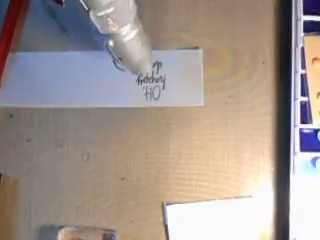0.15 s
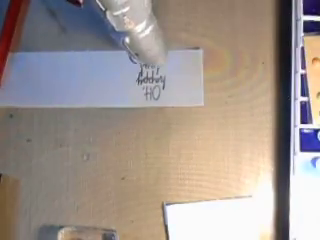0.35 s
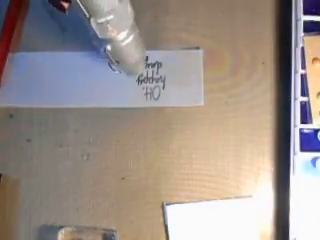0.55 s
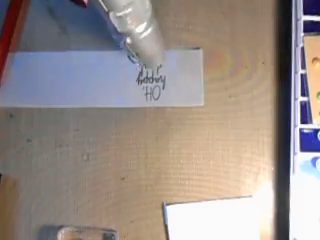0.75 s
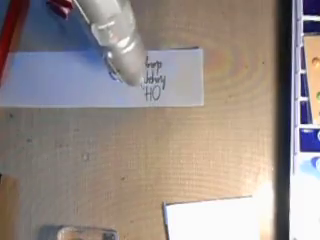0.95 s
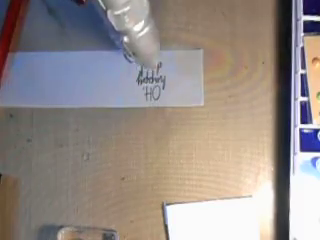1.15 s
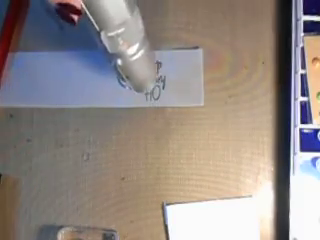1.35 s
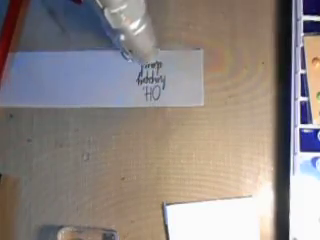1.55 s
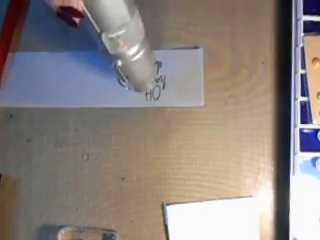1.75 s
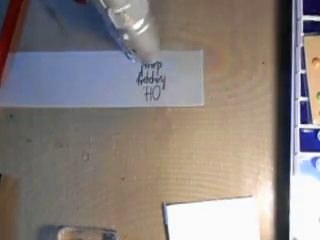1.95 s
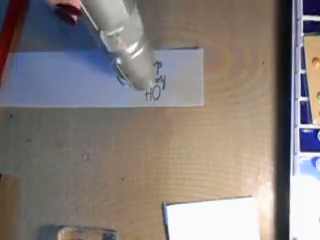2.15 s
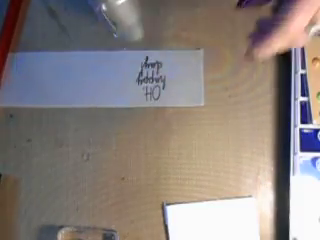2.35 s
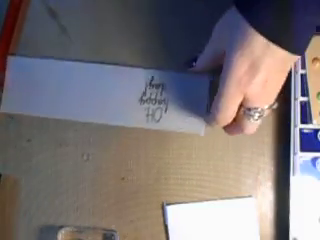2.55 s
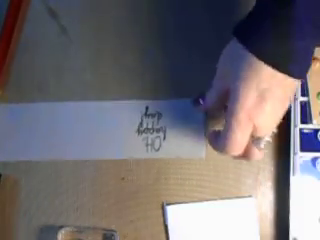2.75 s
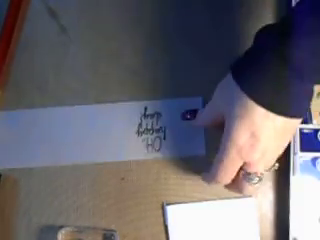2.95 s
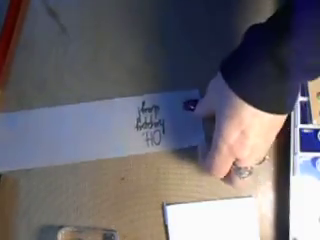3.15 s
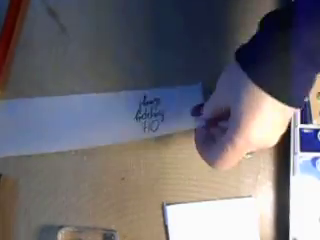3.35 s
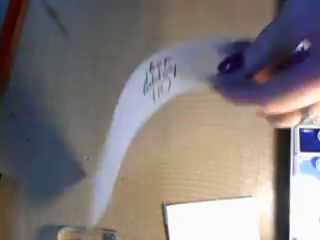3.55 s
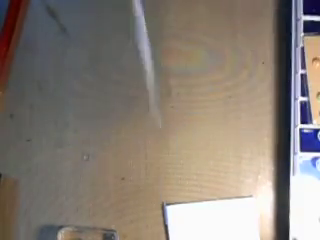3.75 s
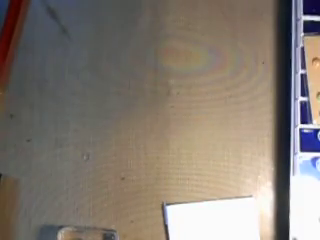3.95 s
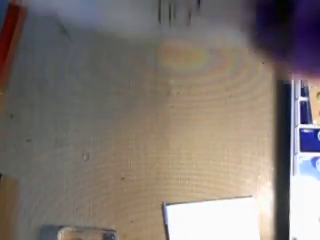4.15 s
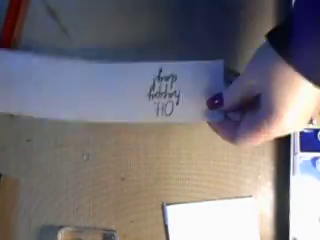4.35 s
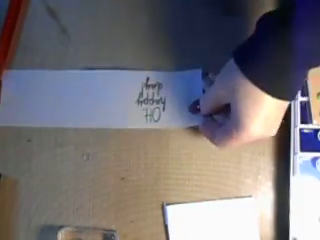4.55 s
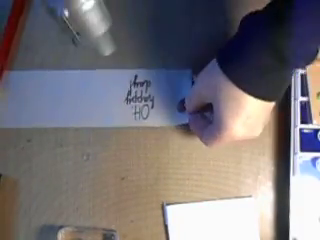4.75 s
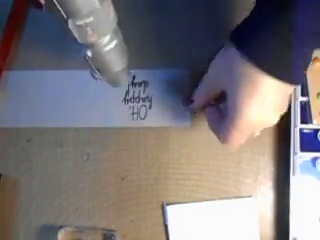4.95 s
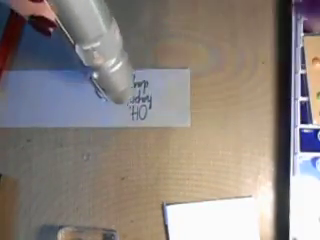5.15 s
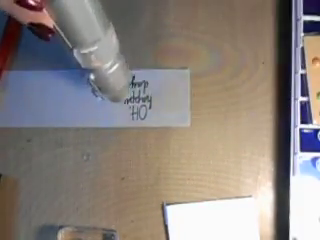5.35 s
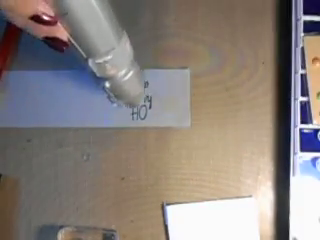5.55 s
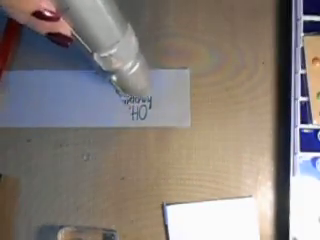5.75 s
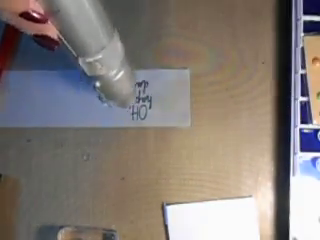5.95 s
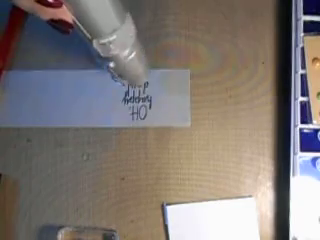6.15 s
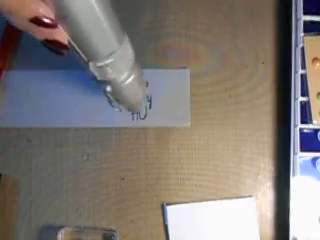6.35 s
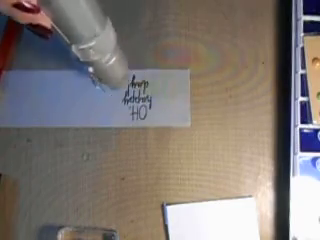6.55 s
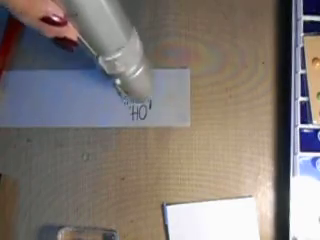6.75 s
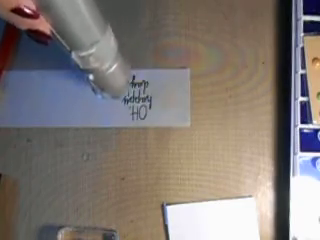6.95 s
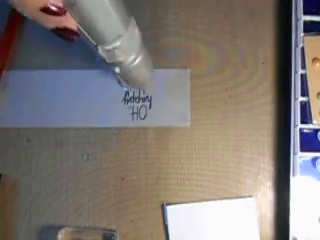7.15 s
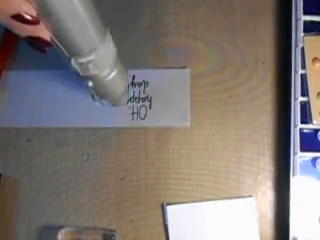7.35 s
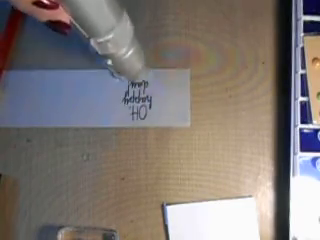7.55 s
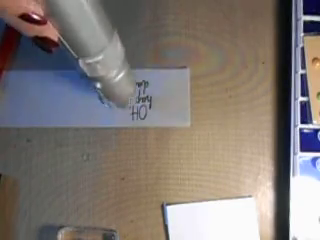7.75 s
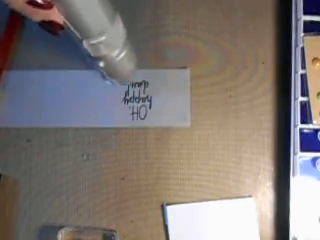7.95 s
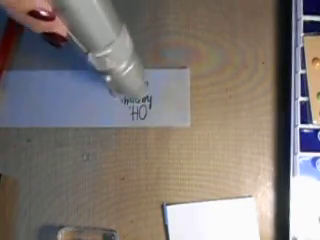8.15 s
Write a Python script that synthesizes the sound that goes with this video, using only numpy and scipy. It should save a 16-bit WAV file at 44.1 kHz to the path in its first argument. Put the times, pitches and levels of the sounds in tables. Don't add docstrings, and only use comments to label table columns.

```python
import sys
import numpy as np
from scipy import signal
from scipy.fft import rfft, irfft, next_fast_len
from scipy.io import wavfile
from scipy.ndimage import uniform_filter1d, map_coordinates

SR = 44100
rng = np.random.default_rng(int(sys.argv[2]) if len(sys.argv) > 2 else 0)


def transcribe(signal):
    frames = np.atleast_2d(signal).T
    limited = np.clip(frames, -1, 1)
    pcm = np.round(limited * 32767).astype(np.int16)
    wavfile.write(sys.argv[1], SR, pcm)


def magnitude_from_level(level_db):
    exponent = np.asarray(level_db, float) / 20
    return 10 ** exponent


N = 362061
RIPPLE_HZ, FIRST_RIPPLED = 120, 9
USUAL_HZ, STEP = 229, 128


def unit(x):
    return x / np.sqrt(np.mean(x ** 2) + 1e-20)


def along(points, hz):
    f, v = np.transpose(points)
    return np.interp(np.log(hz + 1), np.log(f + 1), v)


def curves(rows):
    s, *cols = np.transpose(rows)
    t = np.arange(N) / SR
    return [np.interp(t, s, c, left=c[0], right=c[-1]) for c in cols]


def wobble(rate, size=1):
    knots = rng.standard_normal(int(N * rate / SR) + 4)
    return map_coordinates(knots, [np.arange(0, N, size) * rate / SR], order=1)


def filtered(x, gain_db):
    m = next_fast_len(len(x) + 8192)
    gain = magnitude_from_level(gain_db(np.fft.rfftfreq(m, 1 / SR)))
    return irfft(rfft(x, m) * gain, m)[:len(x)]


def noise(gain_db):
    return unit(filtered(rng.standard_normal(N), gain_db))


ORDER_LEVELS = [-43.5, -54.5, -43.5, -44.5, -33.5, -29, -25.5, -33, -26.5, -30.5, -37.3, -41, -37.0, -35.8,
                -44, -40, -39, -33, -39, -34, -33.5, -38, -43, -41.5, -33, -33, -36.5, -48, -43.5, -41, -37,
                -43.5, -38.5, -42, -45, -45, -44.5, -45, -45.5, -41, -62, -50.5, -40, -49.3, -56]
# frequency_hz, level_db
SIDE_LINES = [(2000, -42.5), (3000, -47.5), (3600, -48.5), (4600, -42), (5500, -45), (6500, -47.5),
              (8500, -51), (10300, -57)]


def whine(flutter_db, side_flutter_db, trim_db, spread):
    turn = np.exp(1j * shaft_angle()).astype(np.complex64)
    mains = np.exp(2j * np.pi * RIPPLE_HZ * np.arange(N) / SR).astype(np.complex64)
    orders = np.arange(len(ORDER_LEVELS)) + 1
    out, spin = np.zeros(N), 1

    def smooth(slow):
        return np.interp(np.arange(N), np.arange(0, N, STEP), slow)

    for k, db, gain in zip(orders, ORDER_LEVELS, arrival(orders)):
        spin = spin * turn
        start = np.exp(1j * (np.pi * k * k / spread + .5 * wobble(2, size=STEP)))
        line_db = db + trim_db * k / FIRST_RIPPLED + flutter_db * wobble(7, size=STEP)
        line = smooth(magnitude_from_level(line_db) * gain * start)
        side_db = along(SIDE_LINES, k * USUAL_HZ) + 2 * rng.standard_normal()
        side_db = side_db + side_flutter_db * wobble(5, size=STEP)
        side = smooth(magnitude_from_level(side_db) * np.sqrt(gain) * start)
        ripple = (mains * np.exp(1j * rng.uniform(0, 2 * np.pi))).real * (k >= FIRST_RIPPLED)
        out += (spin * (line + 2j * ripple * side)).imag
    return np.sqrt(2) * out


# time_s, shaft_hz
SHAFT_SPEED = [(0.0, 228.2), (0.73, 229.4), (0.8, 228.2), (1.39, 228.6), (1.55, 227.6), (1.76, 228.7),
               (2.19, 228.5), (2.38, 227.7), (2.79, 229.0), (3.41, 229.0), (4.0, 229.9), (4.39, 229.9),
               (4.64, 228.0), (4.92, 229.5), (6.54, 229.1), (6.61, 229.5), (8.14, 228.9), (8.21, 228.4)]


def shaft_angle():
    return 2 * np.pi * np.cumsum(curves(SHAFT_SPEED)[0]) / SR


# time_s, pose (numbered as the rows of POSE_SOUND)
HOLDING = [(0, 0), (2.2, 0), (2.36, 1), (2.6, 1), (2.68, 2), (3.3, 2), (3.45, 3), (4.4, 3), (4.5, 4),
           (4.76, 4), (4.84, 5), (5.12, 5), (5.2, 6), (8.21, 6)]
# direct_db, swell_share as the nozzle nears, aside_share of the aside colour in the rush
POSE_SOUND = [
    (-3, 0.25, 0),
    (-3.5, 0.067, 0.19),
    (-2.5, 0, 0.87),
    (-4.3, 0, 1),
    (-2, 0, 1),
    (-2, 0, 0),
    (-3.5, 0.29, 0),
]
# pose, share, delay_ms, added_ms at full reach, added_ms at full sweep
MOVING_PATHS = [(0, 0.43, 0.265, -0.001, 0.002), (0, 0.28, 2.031, -0.03, -0.023),
                (0, 0.2, 2.779, 0.022, 0.016), (0, 0.23, 2.559, 0.03, -0.007),
                (0, 0.3, 0.611, 0.007, 0.008), (0, 0.17, 4.199, -0.041, -0.007),
                (0, 0.12, 2.812, 0.064, 0.007), (0, 0.12, 2.342, -0.043, 0.02),
                (0, 0.16, 2.392, 0.002, 0.006), (6, 0.32, 3.005, -0.006, -0.001),
                (6, 0.26, 0.944, 0.012, 0.014), (6, 0.19, 0.662, -0.07, -0.024),
                (6, 0.14, 1.899, 0.088, 0.028), (6, 0.34, 3.646, 0.003, -0.005),
                (6, 0.16, 2.036, -0.047, 0.006), (6, 0.21, 0.148, 0.024, -0.004),
                (6, 0.27, 3.96, 0.001, 0.003), (6, 0.08, 3.286, -0.015, 0.087)]
# pose, share, delay_ms
STILL_ECHOES = [(1, 0.34, 0.254), (1, 0.22, 1.785), (1, 0.17, 3.751), (1, 0.21, 3.488), (1, 0.13, 2.9),
                (2, 0.51, 0.232), (2, 0.31, 3.455), (2, 0.34, 2.323), (2, 0.26, 1.907), (2, 0.24, 1.48),
                (3, 0.71, 0.242), (3, 0.62, 3.482), (3, 0.5, 1.938), (3, 0.38, 2.017), (3, 0.2, 1.605),
                (4, 0.31, 0.769), (4, 0.09, 3.052), (4, 0.27, 1.777), (4, 0.37, 2.049), (4, 0.22, 2.134),
                (5, 0.32, 0.736), (5, 0.37, 2.921), (5, 0.24, 1.793), (5, 0.27, 1.369), (5, 0.21, 0.248)]


def arrival(orders):
    pose, reach, sweep = (v[::STEP] for v in (*curves(HOLDING), *hand()))
    paths = np.ones((len(POSE_SOUND), len(orders), len(pose)), complex)
    still = [(*row, 0, 0) for row in STILL_ECHOES]
    for held, share, ms, per_reach, per_sweep in list(MOVING_PATHS) + still:
        delay = (ms + per_reach * reach + per_sweep * sweep) / 1000
        paths[int(held)] += share * np.exp(-2j * np.pi * USUAL_HZ * orders[:, None] * delay)
    total = 0
    for held, (db, swell, _) in enumerate(POSE_SOUND):
        presence = np.clip(1 - abs(pose - held), 0, 1)
        total = total + presence * magnitude_from_level(db) * np.exp(swell * reach) * abs(paths[held]) ** 1.235
    return total


# time_s, lap_size
HAND_LAPS = [(0, 0), (.37, 0.57), (.72, 0.66), (1.1, 0.83), (1.46, 0.62), (1.86, 1.6), (2.28, 0.86),
             (2.6, 0), (4.92, 0), (5.27, 0.77), (5.55, 0.69), (5.78, .65), (6.12, 0.62), (6.46, 0.85),
             (6.82, 0.88), (7.16, 0.86), (7.54, 1), (7.9, 0.67), (8.27, 1)]


def hand():
    s, size = np.transpose(HAND_LAPS)
    t = np.arange(N) / SR
    laps_done = np.interp(t, s, range(len(s)))
    place = np.interp(t, s, size) * np.exp(2j * np.pi * laps_done)
    return place.real, place.imag


# time_s, level_db
AIR_LEVEL = [(0, -20.5), (1, -21), (2, -21.5), (2.4, -21.5), (2.7, -24.5), (3.3, -21.5), (3.6, -21),
             (3.85, -21.5), (4.1, -20.5), (4.3, -20.5), (4.5, -23), (4.75, -22.5), (4.9, -21.5),
             (5.3, -21.5), (5.7, -21.5), (6.5, -21.5), (7.5, -21.5), (8.21, -21.5)]
# frequency_hz, density_db per Hz
RUSH_COLOUR = [(20, -22), (70, -28), (150, -12), (300, -10.5), (620, -1), (1000, -6.5), (1450, 1),
               (2000, -2), (3200, -8.5), (4200, -6), (5000, -9), (6200, -13), (8000, -13), (9800, -17.5)]
# centre_hz, width_hz, depth_db
ECHO_HOLLOWS = [(386.5, 39, -10), (514, 44.6, -7.5), (762.5, 30.6, -9), (1198, 92, -10.5), (1763, 103, -3),
                (2199, 77, -11.5), (2444, 29, -7), (2916, 100, -7.5), (3610, 300, -7), (4490, 130, -6),
                (6100, 240, -2)]
# delay_s, share
NEAR_ECHOES = [(.0021, 0.13), (.0047, 0.18)]
# frequency_hz, gain_db
ASIDE_COLOUR = [(330, 1), (500, 5.5), (740, 3.5), (850, 0), (950, 3), (1150, 5.5), (1550, -4.5), (1850, 0),
                (2400, 1), (2800, -3), (3050, 4), (3400, 1), (4100, 0.5), (6000, 1)]
# centre_hz, width_hz, share per reach
NOZZLE_BEAM = (5200, 500, 0.26)


def rush(patchy_db, beat, reach_db):
    (pose,), (air_db,), (reach, _) = curves(HOLDING), curves(AIR_LEVEL), hand()
    z = signal.stft(rng.standard_normal(N + 512), nperseg=512)[2]
    patches = uniform_filter1d(rng.standard_normal(z.shape), 6, 0)
    patches = uniform_filter1d(patches, 20, 1)
    raw = signal.istft(z * magnitude_from_level(patchy_db * unit(patches)), nperseg=512)[1][:N]
    mains = np.sin(2 * np.pi * RIPPLE_HZ * np.arange(N) / SR)
    chop = 1 + beat * (np.sin(shaft_angle()) + 0.7 * mains)

    def colour(hz):
        hollows = sum(db * np.exp(-.5 * ((hz - c) / w) ** 2) for c, w, db in ECHO_HOLLOWS)
        echoes = sum(share * np.exp(-2j * np.pi * hz * s) for s, share in NEAR_ECHOES)
        comb = abs(1 + (hz > 3000) * echoes)
        return along(RUSH_COLOUR, hz) + hollows + 20 * np.log10(comb + 1e-3)

    near = unit(filtered(raw * chop, colour))
    beam_hz, width_hz, share = NOZZLE_BEAM
    near = near + share * reach * filtered(near, lambda hz: -12 * ((hz - beam_hz) / width_hz) ** 2)
    aside = np.interp(pose, range(len(POSE_SOUND)), [part for *_, part in POSE_SOUND])
    turned = filtered(near, lambda hz: along(ASIDE_COLOUR, hz))
    return magnitude_from_level(air_db + reach_db * reach) * ((1 - aside) * near + aside * turned)


# start_s, peak_db, centre_hz, width_hz, t60_s
PAPER_SNAPS = [
    (3.356, 1, 3580, 1200, 0.018),
    (3.3554, 0, 5500, 1500, .015),
    (3.3557, 3, 8000, 3500, .02),
    (3.882, -14, 3750, 220, .3),
    (4.582, -18, 1190, 900, .03),
    (4.066, -4, 2020, 2000, 0.027),
    (4.7835, -9, 4900, 1600, .008),
    (4.7836, -8, 8300, 3000, .008),
    (4.876, -3, 4270, 3200, 0.011),
    (4.913, -15, 10000, 2000, .03),
]


def snaps():
    out, t = np.zeros(N), np.arange(SR // 20) / SR
    for s, db, centre_hz, width_hz, t60 in PAPER_SNAPS:
        burst = filtered(rng.standard_normal(len(t)), lambda hz: -12 * ((hz - centre_hz) / width_hz * 2) ** 2)
        burst = burst * magnitude_from_level(-60 * t / t60) * np.minimum(t / 0.00036, 1)
        out[round(s * SR):][:len(t)] += magnitude_from_level(db) * burst / abs(burst).max()
    return out


# time_s, buffet_db,
# rustle_db
STRIP_WIND = [(3.8, -60, -52), (3.85, -31, -29), (3.885, -17.5, -21), (3.91, -17, -18), (3.93, -18, -27),
              (3.96, -30, -27), (4.02, -5, -42), (4.05, -23, -50), (4.1, -40, -60),
              (4.5, -60, -60), (4.62, -46, -60), (4.82, -70, -60)]
# time_s, swing_hz, level_db
MIC_EDDY = [(3.955, 60, -30), (3.97, 62, -8), (3.989, 128, -8), (3.993, 110, 12), (3.999, 200, 18),
            (4.004, 420, 20), (4.013, 140, 6), (4.022, 150, -3), (4.04, 85, -32)]


def waved_strip():
    buffet_db, rustle_db = curves(STRIP_WIND)
    swing_hz, eddy_db = curves([(0, 60.3, -120), (3.94, 60.3, -120), *MIC_EDDY, (4.08, 80, -120)])
    fade = np.interp(np.arange(N) / SR, [3.7, 3.8, 4.82, 4.9], [0, 1, 1, 0])
    # (Hz, dB per Hz)
    buffet_colour = [(10, -20), (28, 1), (50, 2.5), (90, -12), (160, -9), (500, -16), (1200, -45), (5000, -90)]
    rustle_colour = [(300, -20), (700, 11), (2000, 1), (3000, 2), (4500, -4), (6000, -6), (7500, -20),
                     (11000, -32)]
    ragged_colour = [(60, -12), (300, -0.5), (700, -3.5), (2000, -13), (8000, -36)]
    buffet = noise(lambda hz: along(buffet_colour, hz))
    rustle = unit(magnitude_from_level(6 * wobble(300)) * noise(lambda hz: along(rustle_colour, hz)))
    ragged = noise(lambda hz: along(ragged_colour, hz))
    eddy = np.sin(2 * np.pi * np.cumsum(swing_hz) / SR + 1.3) + .4 * ragged
    return fade * (magnitude_from_level(buffet_db) * buffet + magnitude_from_level(rustle_db) * rustle) + magnitude_from_level(eddy_db) * eddy


# time_s, level_db
SLIDE_LEVEL = [(4.38, -40), (4.46, -24), (4.56, -23), (4.6, -27), (4.64, -22), (4.76, -20.5), (4.8, -25),
               (4.86, -45)]
# frequency_hz, density_db per Hz
SLIDE_BANDS = [(400, -23), (670, 3), (1000, -26), (1450, -17), (2000, -24), (2450, 8), (3000, -18),
               (4900, -7), (8000, -8), (11000, -11)]


def slide():
    grainy = magnitude_from_level(3 * wobble(150)) * noise(lambda hz: along(SLIDE_BANDS, hz))
    level_db = curves([(4.3, -120), *SLIDE_LEVEL, (4.95, -120)])[0]
    return magnitude_from_level(level_db) * unit(grainy)


def scene():
    tool = whine(flutter_db=1, side_flutter_db=2.5, trim_db=.5, spread=4.6)
    air = rush(patchy_db=1.2, beat=.05, reach_db=.4)
    return (tool + air + snaps() + waved_strip() + slide())[None]


# start_s, gain_db, hold_s, recovery_s
GAIN_TRIPS = [
    (3.35, -10.5, .17, .24),
    (3.972, -6, .02, .5),
    (3.99, -13.5, .19, .27),
    (4.783, -4, .3, .25),
]


def gain_control():
    t, gain_db = np.arange(N) / SR, np.zeros(N)
    for s, db, hold, recovery in GAIN_TRIPS:
        after = db * np.exp(-np.maximum(t - s - hold, 0) / recovery)
        gain_db = np.where(t >= s, after, gain_db)
    return uniform_filter1d(gain_db, size=40)


def roll_off(x):
    return signal.sosfilt(signal.butter(12, 12310, fs=SR, output="sos"), x)


# frequency_hz, gain_db
MIC_RESPONSE = [(20, 0.5), (9800, -0.5), (10500, -3), (11000, -11.5), (12000, -18.5), (12400, -36)]


def record(dry):
    x = dry[0] * magnitude_from_level(gain_control())
    x = x / (1 + abs(x / .67) ** 10) ** (1 / 10)
    mix = filtered(x, lambda hz: along(MIC_RESPONSE, hz))[None]
    return roll_off(mix)


dry = scene()
out = record(dry)
transcribe(out)
```